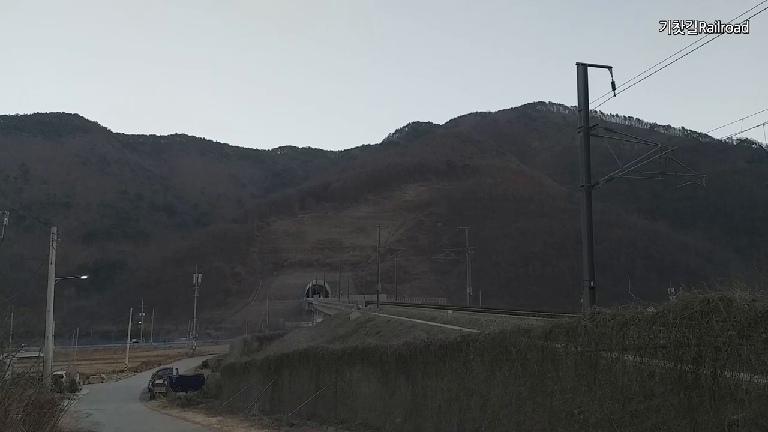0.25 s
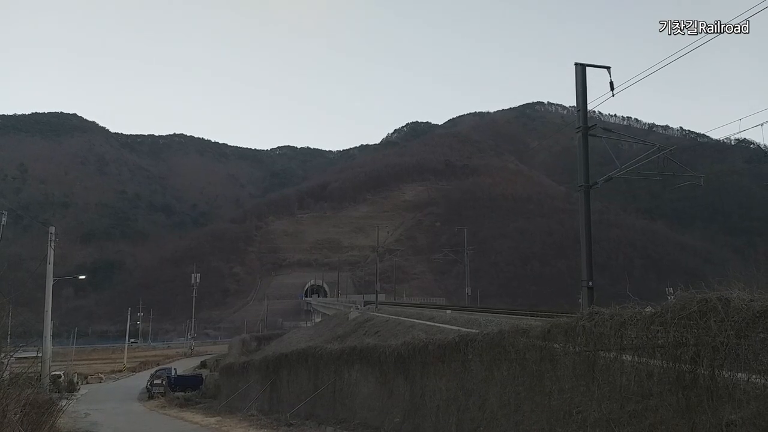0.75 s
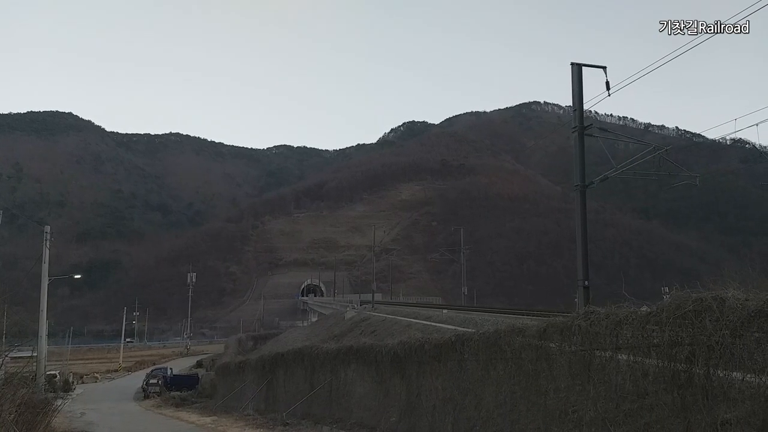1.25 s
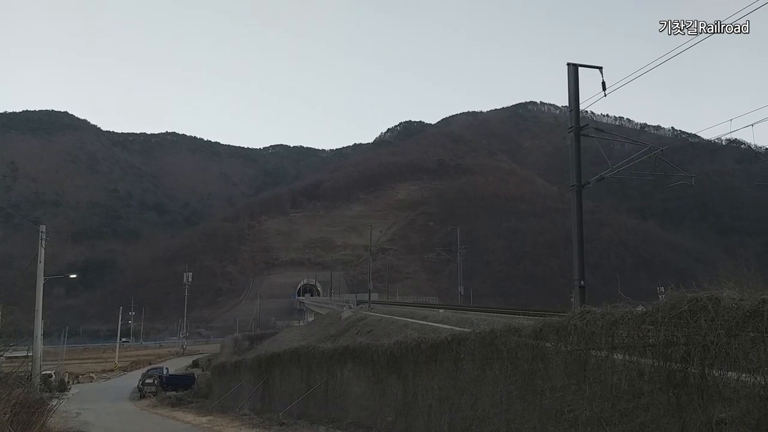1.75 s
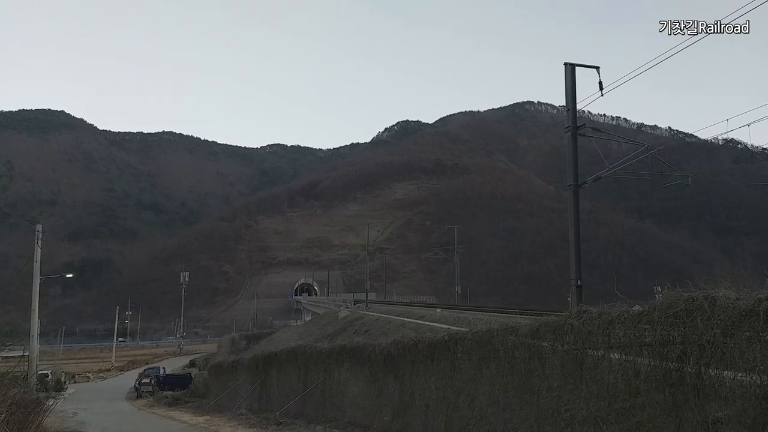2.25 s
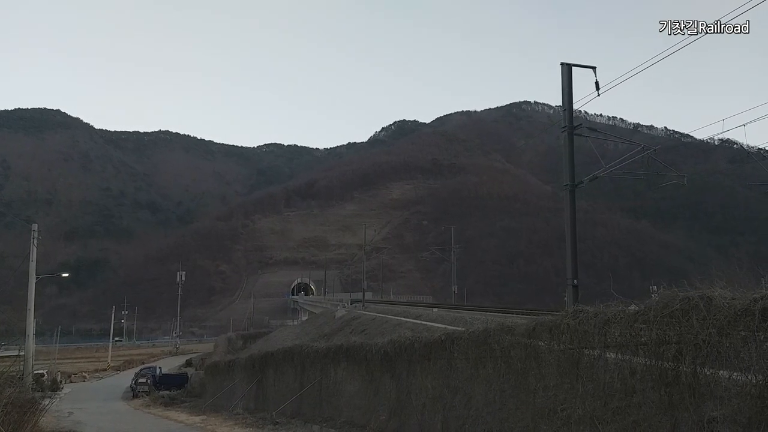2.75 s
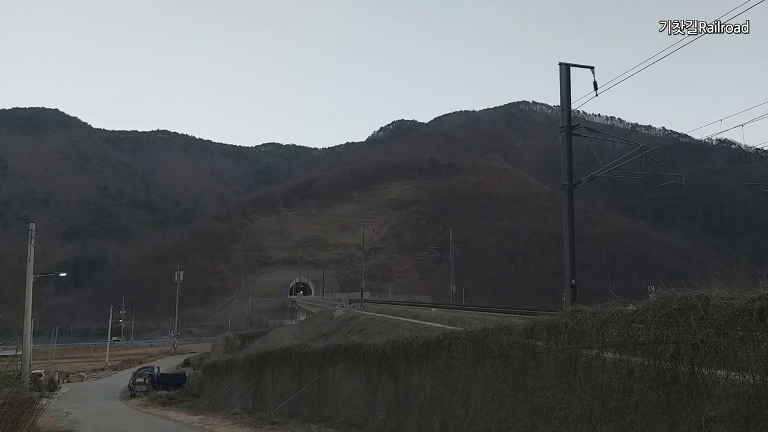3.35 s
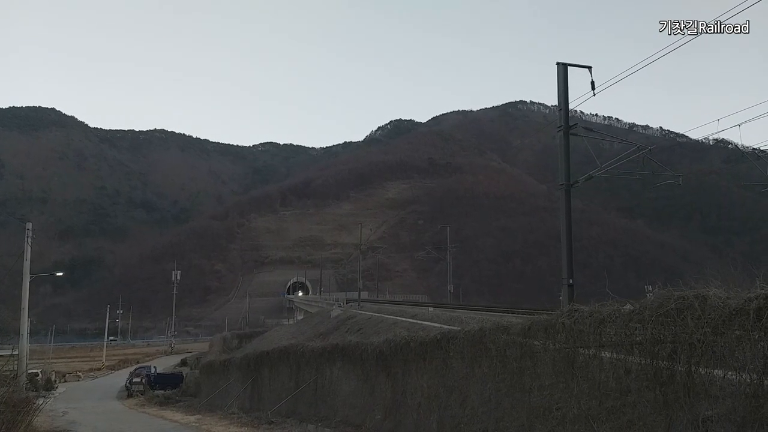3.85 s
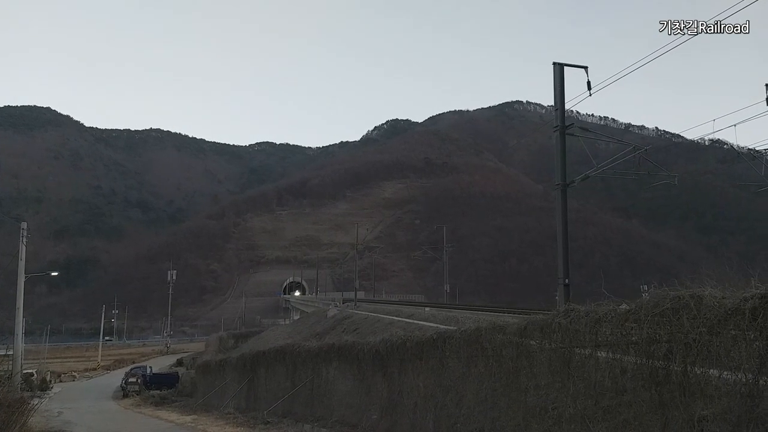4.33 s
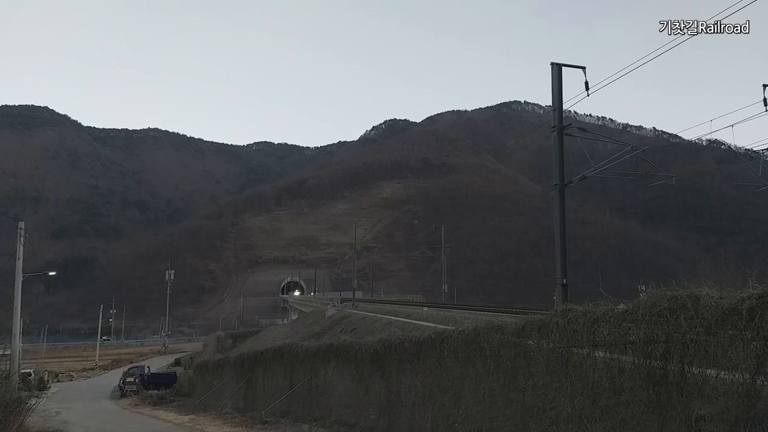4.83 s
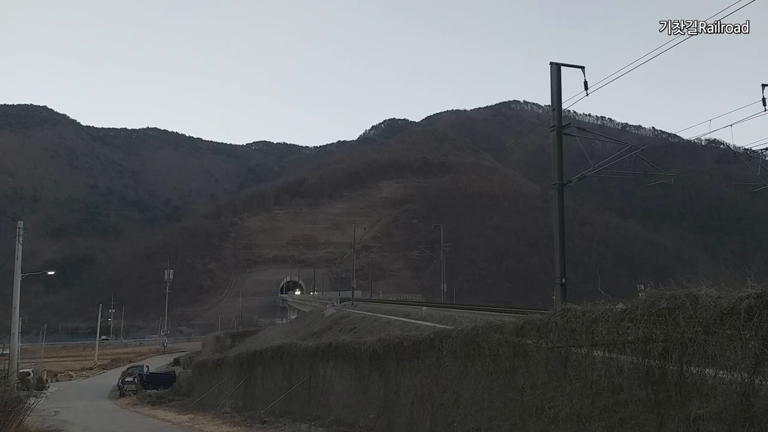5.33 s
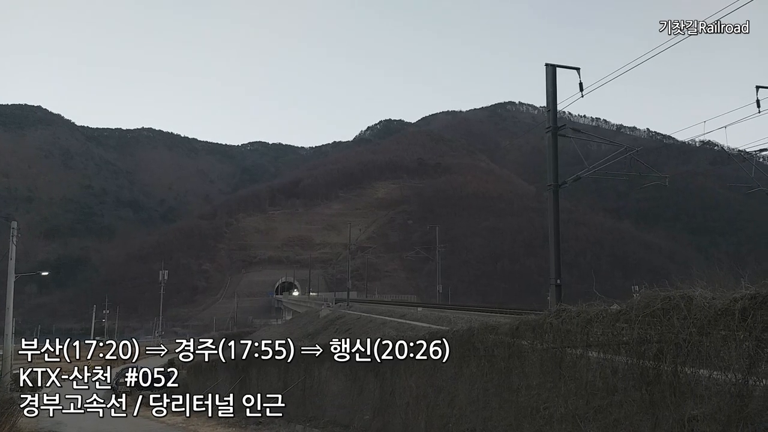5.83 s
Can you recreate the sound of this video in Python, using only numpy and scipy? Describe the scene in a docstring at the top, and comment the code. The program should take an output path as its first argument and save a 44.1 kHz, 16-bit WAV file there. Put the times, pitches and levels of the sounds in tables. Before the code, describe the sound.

From beside a railway in open country, a high-speed train is heard inside a distant tunnel: a low throbbing boom, rushing air and hollow wheel roar. Faint bird chirps come early. The treble gradually opens, wheels howl briefly, and the rails start to sing thinly, then sizzle and hiss increasingly. A few tiny dry rustles come near the end. The stereo microphone stays put; the train never passes.

```python
"""A boom from a distant tunnel comes first, with air and wheel roar: a high-speed train runs toward its mouth,
heard from beside the line in open country. Boom and roar are shaped noise; the treble follows a level curve.
The rails sing and sizzle ahead of the train: noise through narrow modes and bands, rising evenly, with surges.
A wall by the track gives the train one echo. A far bird chirps as bending sine tones; a faint hiss
flickers early on, dry rustles come late, and a faint field hiss lies under all."""
import sys
import numpy as np
from scipy import signal
from scipy.fft import rfft, irfft, next_fast_len
from scipy.io import wavfile
from scipy.ndimage import uniform_filter1d

SR = 44100
rng = np.random.default_rng(int(sys.argv[2]) if len(sys.argv) > 2 else 0)


def waveform_to_disk(signal):
    """Save audio, clipped to [-1, 1], as 16-bit WAV at the path in sys.argv[1]."""
    frames = np.transpose(np.atleast_2d(signal))
    scaled = np.clip(frames, -1, 1) * 32767
    samples = np.round(scaled).astype(np.int16)
    wavfile.write(sys.argv[1], SR, samples)


N = 268436

# Noise spectra: (frequency [Hz], relative density [dB per Hz])
BOOM_SPECTRUM = [(20, -38.5), (33, -26), (43, -23), (53, -10), (63, -7), (78, -4), (99, -1), (118, -7.5),
                 (136, -9), (150, -21)]
AIR_SPECTRUM = [(135, -23.5), (158, -3), (195, -1.5), (255, 0.5), (280, -7), (300, -2.5), (380, 1),
                (520, 3), (590, -3.5), (750, -25)]
WHEEL_SPECTRUM = [(440, -28), (550, -4.5), (635, 1), (720, 2), (820, 2), (890, -1.5), (970, -3), (1060, -2),
                  (1160, -12.5), (1400, -44.5)]
UPPER_SPECTRUM = [(950, -32), (1120, 0), (1260, -1.5), (1400, -6), (1560, -6.5), (1660, -7.5), (1850, -8),
                  (2000, -8.5), (2150, -15.5), (2600, -37), (3300, -63.5)]
BRIGHT_SPECTRUM = [(1950, -13.5), (2160, 1), (2320, 1), (2580, -5.5), (2720, -15), (3100, -46.5)]
EDGE_SPECTRUM = [(2480, -18.5), (2660, 5.5), (2820, 2), (3000, -1), (3300, -13), (3700, -21), (4100, -57.5),
                 (6300, -43)]
CORE_SPECTRUM = [(12000, -22.5), (12450, -4.5), (12800, 1.5), (13350, 3), (13650, -12.5), (14200, -22)]
SIZZLE_SPECTRUM = [(10900, -43), (11350, -13), (11750, -12), (12100, -4), (12500, 0), (12900, 1.5),
                   (13300, -1.5), (13750, 1), (14520, -4), (14660, -23), (15000, -32)]
RAIL_HISS_SPECTRUM = [(8700, -36.5), (9050, -8.5), (9450, -4.5), (9600, 5), (9850, -5), (10350, 3.5),
                      (10750, -3.5), (11300, 8), (11900, -23.5)]
FIELD_SPECTRUM = [(100, -5.5), (3000, 2), (4200, -2.5), (5200, -4.5), (9000, -8), (15000, -3)]
FLICKER_SPECTRUM = [(2800, 3.5), (4500, 0.5), (8000, -3), (12600, -3), (14000, -8), (15200, -24)]
RUSTLE_SPECTRUM = [(3300, 8), (4000, 5), (5200, -2), (5900, -11), (6500, -27)]

# Resonances: (centre [Hz], half width at -6 dB [Hz], relative power [dB])
# rail steel, lower cluster; outer modes that join later; sizzle cluster
RAIL_MODES = [(6900, 40, -13), (6982, 17, -4.5), (7040, 16, -3.5), (7077, 11, 0), (7160, 50, -2),
              (7289, 20, -4), (7386, 11, -5), (7370, 60, -8)]
OUTER_RAIL_MODES = [(6560, 120, -20), (6802, 16, -12), (7386, 11, 0), (7440, 40, -4), (7517, 22, -7),
                    (7640, 70, -12), (7810, 60, -15)]
SIZZLE_MODES = [(11700, 27, -6.5), (11800, 28, 1.5), (12300, 20, -0.5), (12510, 16, 6.5), (12680, 35, 3.5),
                (12400, 35, 1.5), (13000, 30, -1), (13100, 18, 1.5), (13598, 15, -4.5), (13780, 50, -1.5)]
# low and high howling tones of the wheels
LOW_HOWL_MODES = [(795, 27, -0.39), (823, 28, -0.65)]
HIGH_HOWL_MODES = [(1261, 54, 0)]

# Throbs and lulls of the boom: (peak time [s], half length [s], lift [dB])
BOOM_THROBS = [(1.39, 0.035, 2.5), (1.55, 0.046, 2), (2.22, 0.042, -2), (3.05, 0.049, -7),
               (3.82, 0.033, 4.5), (4.03, .05, -3.5), (5.32, 0.047, 4)]
# Body of the roar: (time [s], rushing air level [dB], rolling wheels level [dB])
ROLLING = [(0, -54, -48.5), (1.0, -50.5, -47), (1.85, -51, -45), (2.3, -50.5, -46.5), (3.3, -48.5, -46.5),
           (3.7, -49.5, -47.5), (4.2, -50, -45), (4.8, -51.5, -45.5), (5.6, -48.5, -45), (6.08, -47.5, -43)]
# Roar escaping the portal; only the swing about the mean is used: (time [s], treble level [dB])
ESCAPE = [(0.0, -88), (0.7, -73.5), (1.3, -71.5), (2.45, -72), (3.15, -64), (3.5, -63), (4.2, -66),
          (5.25, -58.5), (6.08, -58.5)]
# Broad nasal bands: (centre [Hz], half width at -6 dB [Hz], level at 0 s [dB], rise [dB per s])
NASAL_BANDS = [(1376, 120, -61.5, -1.7), (1915, 80, -67.5, 0), (1842, 80, -87, 5.5), (2297, 54, -86, 2.5)]
# Bulges of the roar: (peak time [s], half length [s], centre [Hz], peak level [dB])
ROAR_SWELLS = [(1.55, 0.67, 404, -57), (2.7, .5, 636, -54), (5.0, 0.62, 220.6, -58),
               (5.537, 0.25, 520, -52), (5.753, 0.5, 680, -53), (5.8, 0.5, 326, -59)]
# Wheel howls: (peak time [s], half length [s], low tone level [dB], high tone level [dB])
HOWLS = [(0.296, 0.17, -50.5, -67), (1.757, 0.86, -57, -66.5), (3.694, 0.12, -61.5, -54),
         (4.052, 0.099, -46, -52), (4.25, 0.086, -50, -64.5), (4.853, 0.37, -54, -55.5),
         (5.727, 0.49, -66, -52.5)]
# Rail surges: (peak time [s], half length [s], singing lift [dB], sizzle and hiss lift [dB])
RAIL_SURGES = [(1.748, 0.39, -1, 7.5), (2.173, 0.19, 3, -11), (2.85, 0.4, 2.5, 4.5), (4.483, 0.48, -2, 6.5),
               (5.296, 0.12, 4, 0)]
# Hiss flickers: (start [s], length [s], level [dB])
FLICKERS = [(.005, 0.15, -80.5), (.347, 0.032, -82), (0.409, 0.029, -79.5), (0.474, 0.07, -81.5),
            (1.095, 0.025, -81.5), (1.412, 0.03, -79.5), (2.309, 0.027, -82)]
# Bird chirps: (start [s], length [s], start pitch [Hz], end pitch [Hz], peak level [dB])
CHIRPS = [(0.297, .03, 3980, 3780, -87), (0.309, .054, 3850, 3100, -75.5),
          (1.748, 0.051, 4020, 3790, -85.5), (1.79, 0.035, 3620, 3640, -84.5), (1.81, .04, 3150, 3300, -83),
          (1.828, .042, 3680, 3570, -84)]
# Dry rustles: (peak time [s], half length [s], peak level [dB])
RUSTLES = [(4.905, .02, -84.5), (5.342, .01, -83), (5.368, .011, -76), (5.413, .028, -83),
           (5.503, .014, -74), (5.527, 0.009, -71), (5.546, .012, -93)]

BOOM_DB, BOOM_RISE_DB_PER_S = -56.5, 0.5
# roar treble: level at the mean escape, share of its swing followed [dB per dB]
UPPER_DB, UPPER_FOLLOWS = -53.5, 0.49
BRIGHT_DB, BRIGHT_FOLLOWS = -69, 1.24
EDGE_DB, EDGE_FOLLOWS = -83.5, 0.8
# the top edge opens further once the train is close to the mouth
EDGE_OPENS_S, EDGE_RISE_DB_PER_S = 4, 5.5
SWELL_HALF_WIDTH_HZ = 61
# band cancelled by the ground reflection: centre at 0 s, fall, half width, gain at the centre
DIP_HZ, DIP_SINK_HZ_PER_S, DIP_HALF_WIDTH_HZ, DIP_DB = 1748, 40, 90, -3
WALL_LAG_S, WALL_ECHO_DB, WALL_CUT_HZ = .0236, -13.5, 2000
FIELD_DB = -102
FLICKER_FADE_S = 0.0072
CHIRP_WAVER_HZ = 50  # rms
SCATTER_DB, SCATTER_T60_S = -7, .18
# rails: open level at RAILS_AT_S before surges, and steady rise
RAILS_AT_S = 6.23
SING_DB, SING_RISE_DB_PER_S = -64.5, 8
CORE_DB, CORE_RISE_DB_PER_S = -76, 3.5
SIZZLE_DB, SIZZLE_RISE_DB_PER_S = -62, 6.5
HISS_DB, HISS_RISE_DB_PER_S = -68, 17
OUTER_DB = -9  # relative to the singing
# midpoint of each rail band's opening, default time constant, offset before it
CORE_FROM_S, SING_FROM_S, SIZZLE_FROM_S, HISS_FROM_S, OUTER_FROM_S = 1.45, 2.43, 3.2, 4.4, 4.4
RAILS_OPEN_S, UNEXCITED_DB = .07, -15
RUSTLE_GRAINS_PER_S, RUSTLE_GRAIN_DB = 300, -2
# resonance by which the two microphone ports differ; start of the stop band
PORT_HZ, PORT_HALF_WIDTH_HZ, PORT_DB = 1880, 260, -12.5
STOP_BAND_HZ = 16200


def from_db(db):
    """Decibels to gain."""
    return 10 ** (np.asarray(db) / 20)


def rms_one(x):
    """Scale to an rms of one."""
    return x / np.sqrt(np.mean(x ** 2) + 1e-20)


def time_s():
    """Time of every sample."""
    return np.arange(N) / SR


def in_time(rows):
    """Each column of a curve table at every sample."""
    knots_s, *columns = np.transpose(rows)
    return [np.interp(time_s(), knots_s, column) for column in columns]


def bin_hz():
    """Frequencies of the spectrum bins, at least 1 Hz."""
    return np.maximum(np.fft.rfftfreq(next_fast_len(N, True), 1 / SR), 1)


def contour(points):
    """Gain per bin from spectrum points, falling steeply beyond both ends."""
    hz, db = np.transpose(sorted(points))
    f = bin_hz()
    skirt = np.minimum(1, np.minimum(f / hz[0], hz[-1] / f)) ** 4
    return skirt * from_db(np.interp(np.log(f), np.log(hz), db))


def resonances(modes):
    """Gain per bin of a set of modes; their powers add."""
    f = bin_hz()
    power = 0
    for hz, half_width_hz, db in modes:
        shape = 1 / (1 + ((f - hz) / half_width_hz) ** 2) ** 2
        power = power + from_db(db) ** 2 / half_width_hz * shape
    return np.sqrt(power)


def noise(gain):
    """Noise with the given gain per bin; rms 1."""
    real, imaginary = rng.standard_normal((2, len(gain)))
    return rms_one(irfft(gain * (real + 1j * imaginary))[:N])


def steady(x, span_s):
    """Even out swells that last longer than the span."""
    power = uniform_filter1d(x ** 2, max(int(span_s * SR), 2))
    return x / np.sqrt(power + 1e-12)


def turbulence(gain, side_db, span_s):
    """Stereo rush: an evened direct wave in both ears plus scattered sound in opposite phase."""
    direct = steady(noise(gain), span_s)
    scattered = from_db(side_db) * noise(gain)
    return direct + scattered * [[1], [-1]]


def flutter(rate_hz, depth_db):
    """Random gain, fading above the given rate; slow, it is moving air bending sound on its way."""
    wander = noise(1 / (1 + (bin_hz() / rate_hz) ** 2))
    return from_db(depth_db * wander)


def swells(rows):
    """Sum of bell-shaped swells (peak time [s], half length to 1/e [s], height)."""
    t = time_s()
    return sum(height * np.exp(-((t - peak_s) / half_s) ** 2) for peak_s, half_s, height in rows)


def tunnel_boom():
    """The air column in the bore throbs around 90 Hz."""
    boom_db = BOOM_DB + BOOM_RISE_DB_PER_S * time_s() + swells(BOOM_THROBS)
    return from_db(boom_db) * turbulence(contour(BOOM_SPECTRUM), side_db=-57.0, span_s=0.21)


def train_roar():
    """Pushed air below, wheels on rails above; three treble bands follow the escape from the portal."""
    escape_db, = in_time(ESCAPE)
    air_db, wheel_db = in_time(ROLLING)
    swing_db = escape_db - escape_db.mean()
    opening_db = EDGE_RISE_DB_PER_S * np.maximum(time_s() - EDGE_OPENS_S, 0)
    upper_db = UPPER_DB + UPPER_FOLLOWS * swing_db
    bright_db = BRIGHT_DB + BRIGHT_FOLLOWS * swing_db
    edge_db = EDGE_DB + EDGE_FOLLOWS * swing_db + opening_db

    air = from_db(air_db) * turbulence(contour(AIR_SPECTRUM), side_db=-71.0, span_s=0.079)
    wheels = from_db(wheel_db) * turbulence(contour(WHEEL_SPECTRUM), side_db=-58.5, span_s=0.15)
    upper = from_db(upper_db) * turbulence(contour(UPPER_SPECTRUM), side_db=-33, span_s=0.11)
    bright = from_db(bright_db) * turbulence(contour(BRIGHT_SPECTRUM), side_db=-19.5, span_s=0.43)
    edge = from_db(edge_db) * turbulence(contour(EDGE_SPECTRUM), side_db=-12.5, span_s=0.29)

    body = air * flutter(rate_hz=4, depth_db=1.5) + wheels * flutter(rate_hz=2.7, depth_db=1.02)
    treble = (upper + bright + edge) * flutter(rate_hz=5.5, depth_db=0.78)
    return body + treble


def nasal_bands():
    """Broad resonances in the roar, each steady, rising or falling in level."""
    out = 0
    for hz, half_width_hz, start_db, rise_db_per_s in NASAL_BANDS:
        gain = resonances([(hz, half_width_hz, 0)])
        level = from_db(start_db + rise_db_per_s * time_s())
        out = out + level * turbulence(gain, side_db=-25, span_s=.2)
    return out


def ground_dip(x):
    """Sound glancing off the ground weakens one band, which slides down as the train nears."""
    centre_hz = DIP_HZ - DIP_SINK_HZ_PER_S * time_s()
    turn = np.exp(2j * np.pi * np.cumsum(centre_hz) / SR)
    low_pass = signal.butter(1, DIP_HALF_WIDTH_HZ, fs=SR, output="sos")
    # shift the band to 0 Hz, isolate it, shift it back
    band = signal.sosfiltfilt(low_pass, x / turn, padtype=None)
    return x - (1 - from_db(DIP_DB)) * 2 * np.real(band * turn)


def wall_echo(x):
    """One dull reflection combs the sound into ripples about 42 Hz apart."""
    lag = round(WALL_LAG_S * SR)
    low_pass = signal.butter(1, WALL_CUT_HZ, fs=SR, output="sos")
    dull = signal.sosfiltfilt(low_pass, x)
    return x + from_db(WALL_ECHO_DB) * np.pad(dull, ((0, 0), (lag, 0)))[:, :N]


def field_hiss():
    """Faint, slightly wavering broadband hiss of the open field."""
    hiss = turbulence(contour(FIELD_SPECTRUM), side_db=7.0, span_s=.3)
    return from_db(FIELD_DB) * hiss * flutter(rate_hz=10, depth_db=2.5)


def hiss_flicker():
    """A faint broad hiss that comes and goes abruptly."""
    t = time_s()
    level = 0
    for start_s, length_s, db in FLICKERS:
        inside_s = np.minimum(t - start_s, start_s + length_s - t)
        level = level + from_db(db) * np.clip(inside_s / FLICKER_FADE_S + .5, 0, 1)
    return level * turbulence(contour(FLICKER_SPECTRUM), side_db=-2, span_s=.1)


def wheel_howl():
    """Wheels howl near the portal: two hollow narrow-band tones come and go inside the roar."""
    low = swells((s, half, from_db(db)) for s, half, db, _ in HOWLS)
    high = swells((s, half, from_db(db)) for s, half, _, db in HOWLS)
    low_tone = turbulence(resonances(LOW_HOWL_MODES), side_db=-42, span_s=0.42)
    high_tone = turbulence(resonances(HIGH_HOWL_MODES), side_db=-30.0, span_s=0.034)
    return low * low_tone + high * high_tone


def bird():
    """Thin bending chirps, loudest past their middle; the slope scatters them back."""
    t = time_s()
    out = np.zeros(N)
    waver_hz = CHIRP_WAVER_HZ * noise(1 / (1 + (bin_hz() / 150) ** 2))
    for start_s, length_s, start_hz, end_hz, db in CHIRPS:
        along = np.clip((t - start_s) / length_s, 0, 1)
        hz = start_hz + (end_hz - start_hz) * along ** 1.4 + waver_hz
        envelope = np.sin(np.pi * along ** 1.9)
        out += from_db(db) * envelope * np.sin(2 * np.pi * np.cumsum(hz) / SR)
    tail_s = np.arange(int(SCATTER_T60_S * SR)) / SR
    tail = rng.standard_normal(len(tail_s)) * from_db(-60 * tail_s / SCATTER_T60_S)
    tail = tail / np.sqrt(np.sum(tail ** 2))
    return out + from_db(SCATTER_DB) * signal.fftconvolve(out, tail)[:N]


def roar_swells():
    """The body of the roar bulges in one low band after another."""
    out = 0
    for peak_s, half_s, hz, db in ROAR_SWELLS:
        gain = resonances([(hz, SWELL_HALF_WIDTH_HZ, 0)])
        level = swells([(peak_s, half_s, from_db(db))])
        out = out + level * turbulence(gain, side_db=-54.5, span_s=0.086)
    return out


def arrival_db(from_s, open_s=RAILS_OPEN_S):
    """A rail band lies quieter until the vibration reaches it."""
    return UNEXCITED_DB * (1 - np.tanh((time_s() - from_s) / open_s)) / 2


def pass_bands(spacing_hz, depth_db):
    """A rail on evenly spaced sleepers carries sound best in a row of narrow bands."""
    return from_db(depth_db * np.cos(2 * np.pi * bin_hz() / spacing_hz))


def singing_rails():
    """Rolling wheels excite modes near 7 kHz, a sizzle widening from a thin core, then a hiss between."""
    t = time_s() - RAILS_AT_S
    sing_surge_db = swells((s, half, db) for s, half, db, _ in RAIL_SURGES)
    surge_db = swells((s, half, db) for s, half, _, db in RAIL_SURGES)
    sleepers = pass_bands(spacing_hz=71, depth_db=2.5)

    sing_db = SING_DB + SING_RISE_DB_PER_S * t + sing_surge_db
    inner_db = sing_db + arrival_db(SING_FROM_S)
    outer_db = sing_db + OUTER_DB + arrival_db(OUTER_FROM_S)
    inner = from_db(inner_db) * turbulence(resonances(RAIL_MODES), side_db=-13.5, span_s=0.084)
    outer = from_db(outer_db) * turbulence(resonances(OUTER_RAIL_MODES), side_db=-10.5, span_s=0.1)

    core_db = CORE_DB + CORE_RISE_DB_PER_S * t + surge_db + arrival_db(CORE_FROM_S)
    sputter = rms_one(flutter(rate_hz=18, depth_db=3.5))
    core_noise = turbulence(contour(CORE_SPECTRUM) * sleepers, side_db=-5.5, span_s=0.19)
    core = from_db(core_db) * sputter * core_noise

    sizzle_db = SIZZLE_DB + SIZZLE_RISE_DB_PER_S * t + surge_db + arrival_db(SIZZLE_FROM_S, open_s=0.49)
    sizzle_gain = rms_one(contour(SIZZLE_SPECTRUM) * sleepers)
    sizzle_gain = sizzle_gain + from_db(-8.5) * rms_one(resonances(SIZZLE_MODES))
    sizzle = from_db(sizzle_db) * turbulence(sizzle_gain, side_db=-12.5, span_s=0.17)

    hiss_db = HISS_DB + HISS_RISE_DB_PER_S * t + surge_db + arrival_db(HISS_FROM_S, open_s=.4)
    hiss = from_db(hiss_db) * turbulence(contour(RAIL_HISS_SPECTRUM) * sleepers, side_db=-5.0, span_s=.15)

    ringing = (inner + outer + hiss) * flutter(rate_hz=8.0, depth_db=1.5)
    return ringing + (core + sizzle) * flutter(rate_hz=12, depth_db=0.5)


def rustles():
    """Brief grainy swishes nearby: bell-shaped noise bursts with fast random gain."""
    level = swells((s, half, from_db(db)) for s, half, db in RUSTLES)
    grains = rms_one(flutter(RUSTLE_GRAINS_PER_S, RUSTLE_GRAIN_DB))
    return level * turbulence(contour(RUSTLE_SPECTRUM), side_db=-7, span_s=.1) * grains


def scene():
    """Train with its wall echo, rails, bird, rustles and flicker over the field hiss."""
    ease_in = np.minimum(time_s() / .004, 1)
    roar = ground_dip(train_roar() + nasal_bands())
    train = ease_in * (tunnel_boom() + roar + wheel_howl() + roar_swells())
    return wall_echo(train) + field_hiss() + hiss_flicker() + bird() + singing_rails() + rustles()


def record(dry):
    """A port resonance lifts the left and lowers the right near 1.9 kHz; the top is cut."""
    f = bin_hz()
    port = from_db(PORT_DB) / (1 + 1j * (f - PORT_HZ) / PORT_HALF_WIDTH_HZ)
    # long waves reach both ports alike
    port = port / (1 + (800 / f) ** 8)
    spectrum = rfft(dry, next_fast_len(N, True))
    ports = irfft(spectrum * (1 + port * [[1], [-1]]))[:, :N]
    top_cut = signal.cheby2(12, 70, STOP_BAND_HZ, fs=SR, output="sos")
    return signal.sosfilt(top_cut, ports)


dry = scene()
out = record(dry)
waveform_to_disk(out)
```